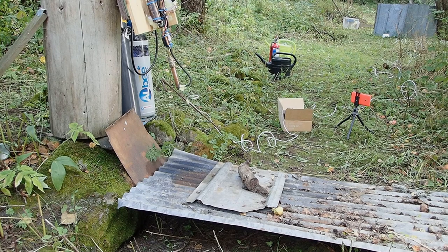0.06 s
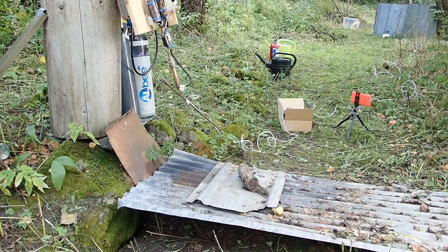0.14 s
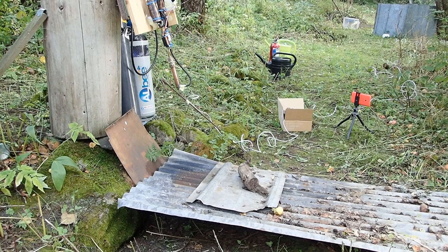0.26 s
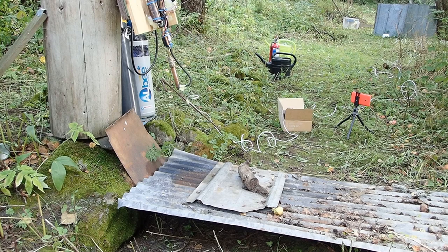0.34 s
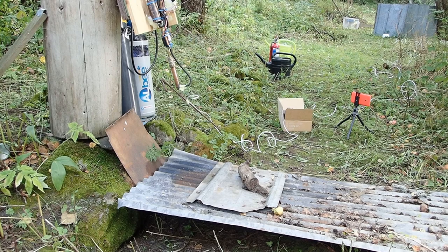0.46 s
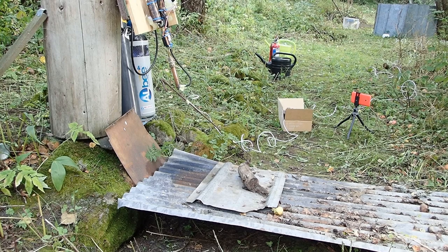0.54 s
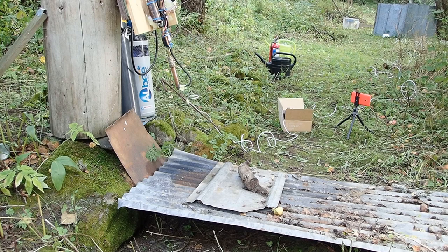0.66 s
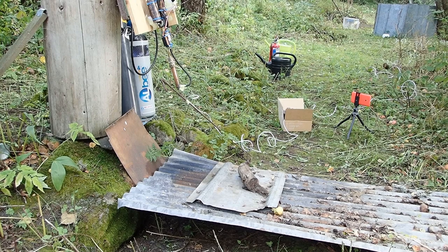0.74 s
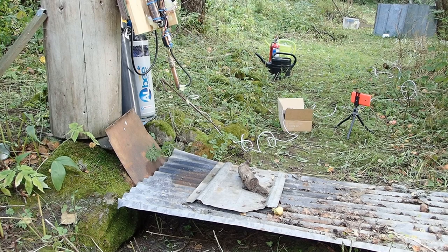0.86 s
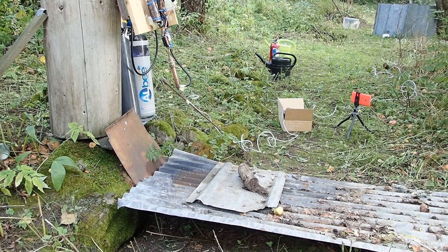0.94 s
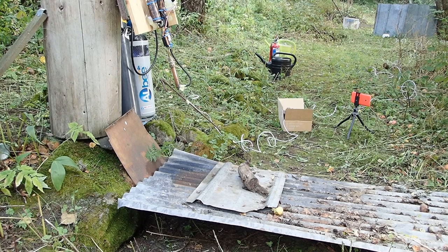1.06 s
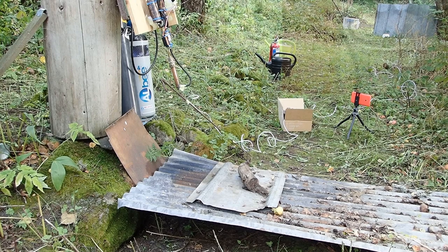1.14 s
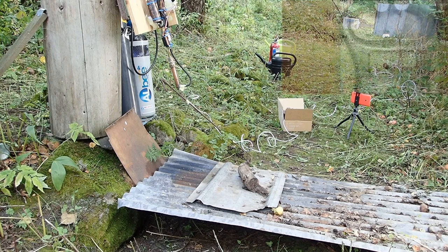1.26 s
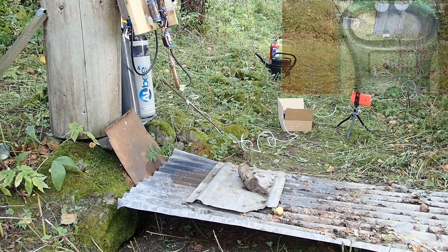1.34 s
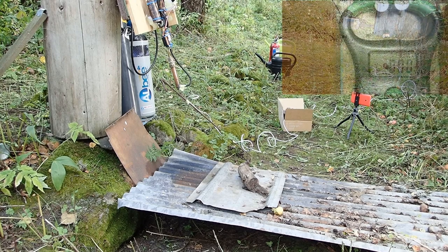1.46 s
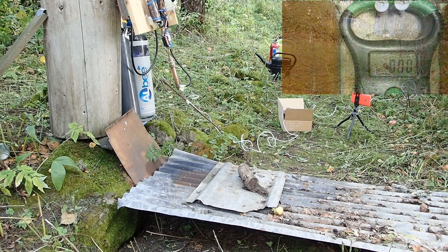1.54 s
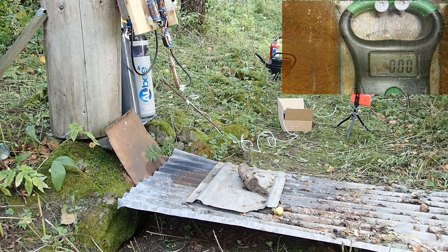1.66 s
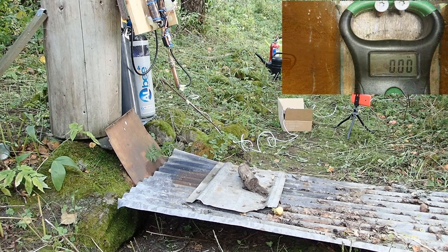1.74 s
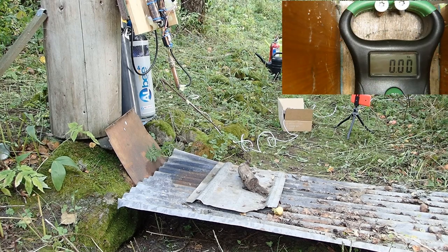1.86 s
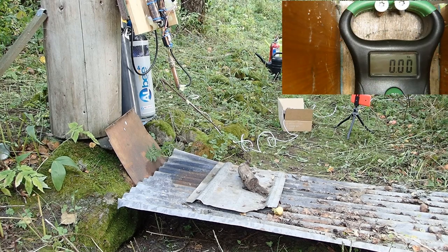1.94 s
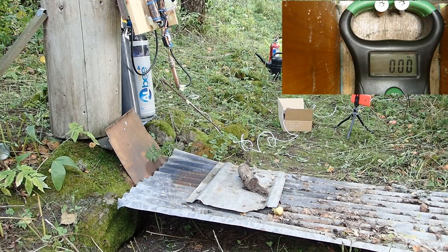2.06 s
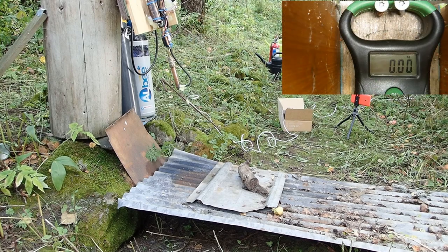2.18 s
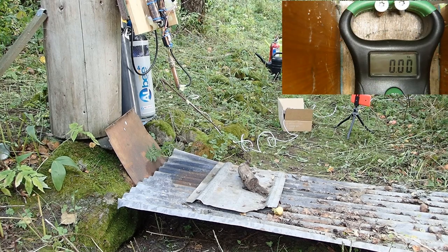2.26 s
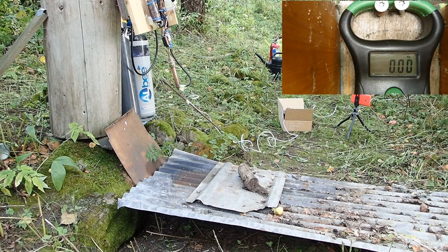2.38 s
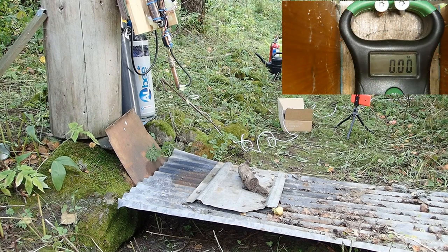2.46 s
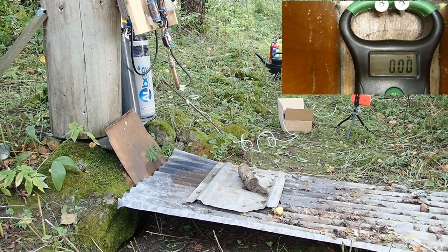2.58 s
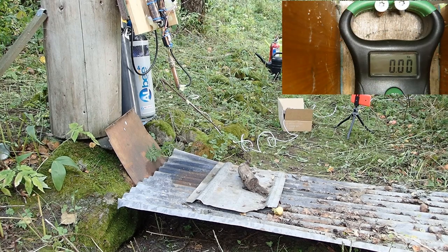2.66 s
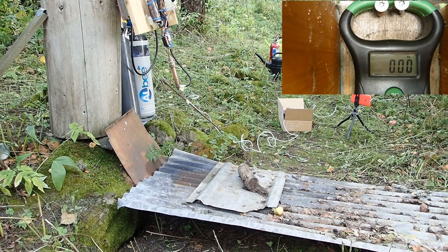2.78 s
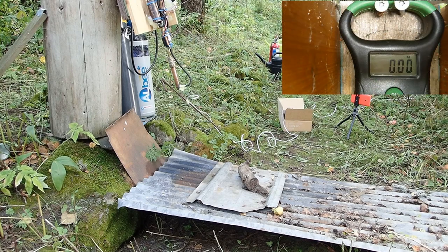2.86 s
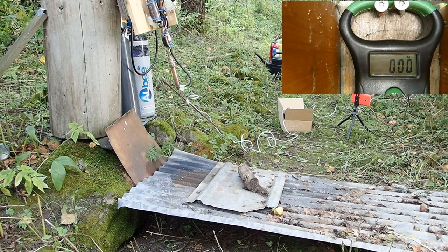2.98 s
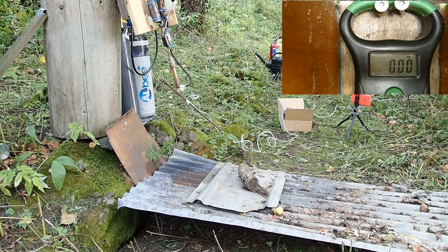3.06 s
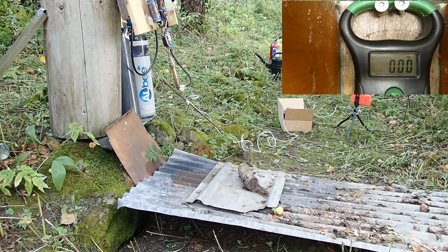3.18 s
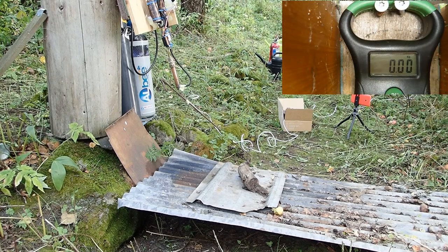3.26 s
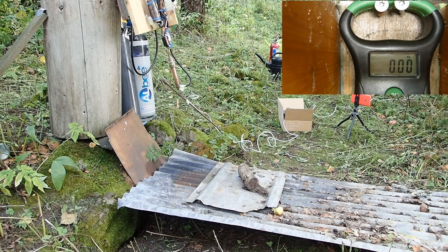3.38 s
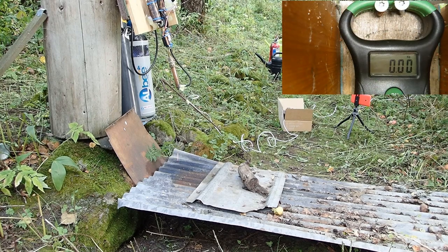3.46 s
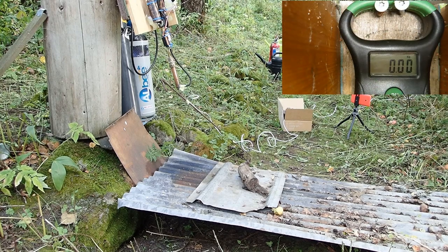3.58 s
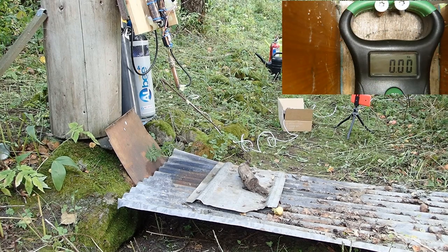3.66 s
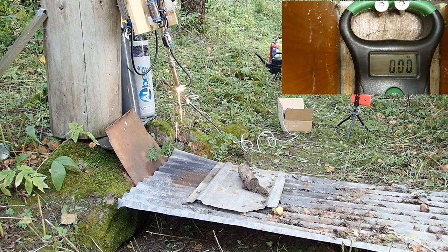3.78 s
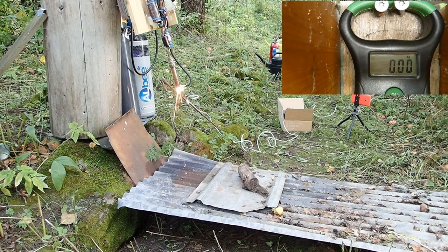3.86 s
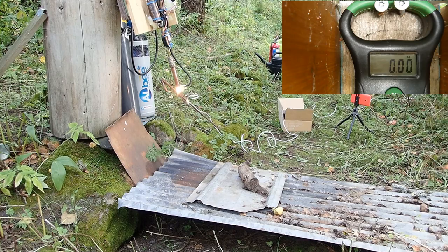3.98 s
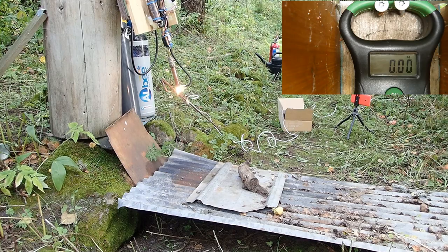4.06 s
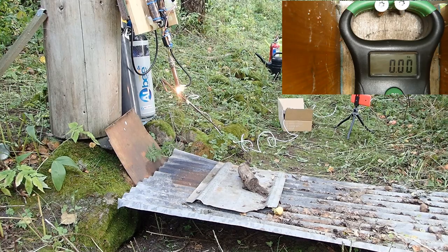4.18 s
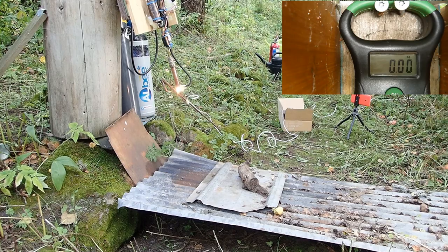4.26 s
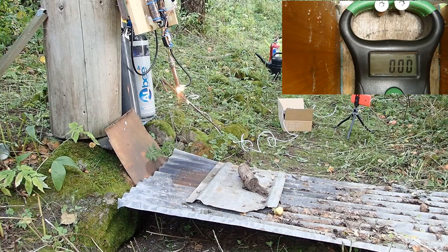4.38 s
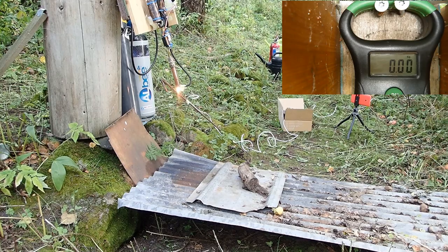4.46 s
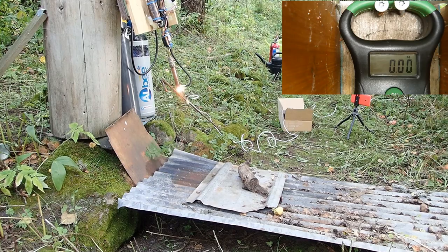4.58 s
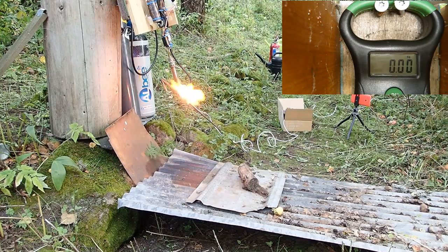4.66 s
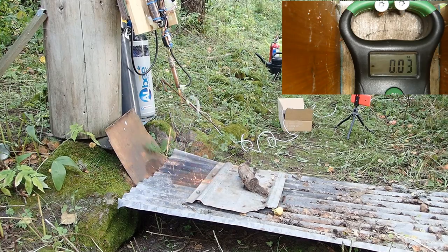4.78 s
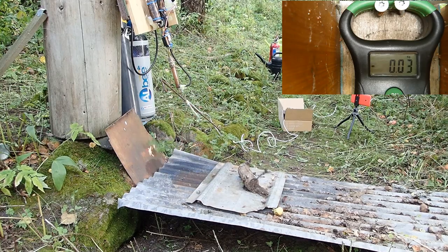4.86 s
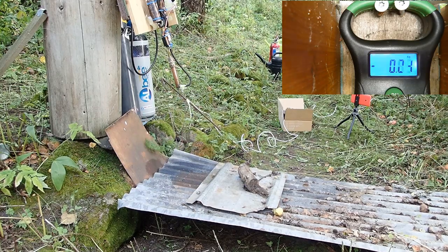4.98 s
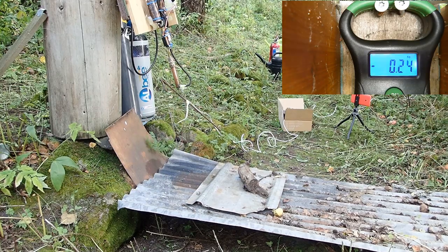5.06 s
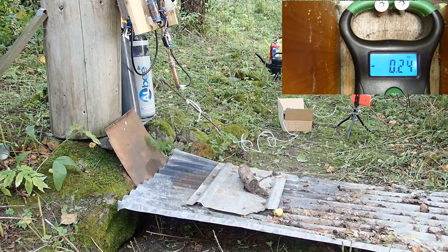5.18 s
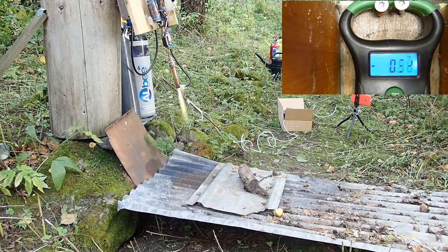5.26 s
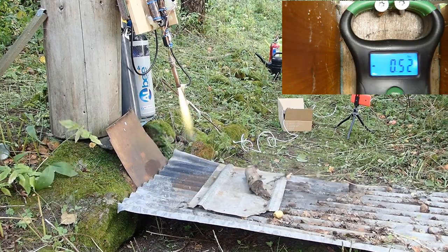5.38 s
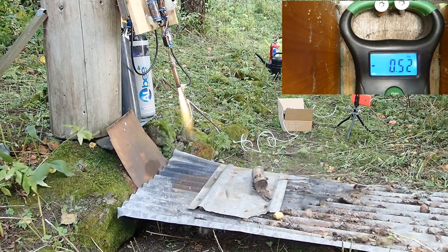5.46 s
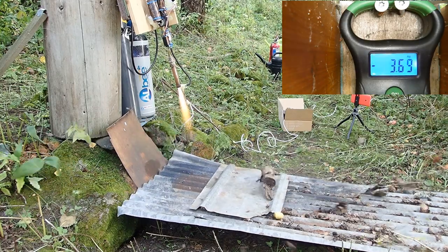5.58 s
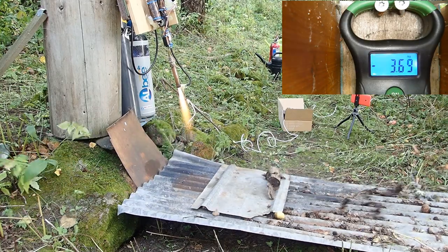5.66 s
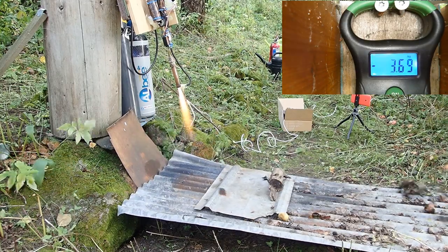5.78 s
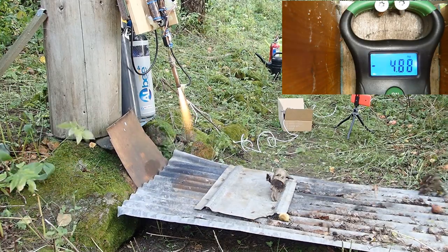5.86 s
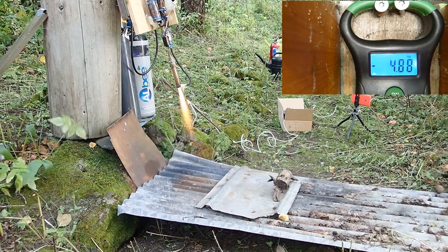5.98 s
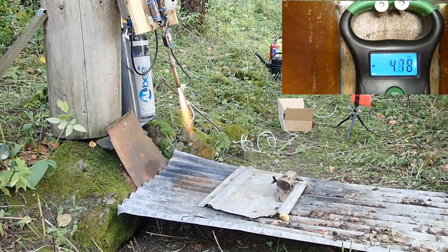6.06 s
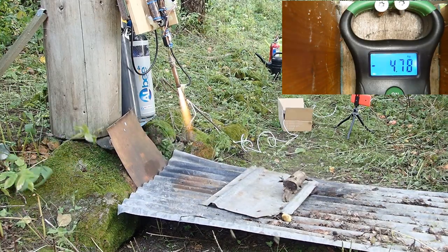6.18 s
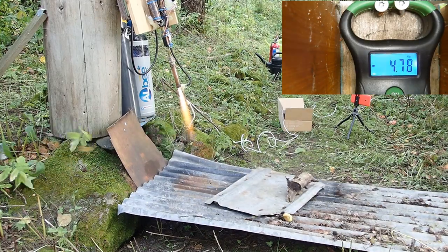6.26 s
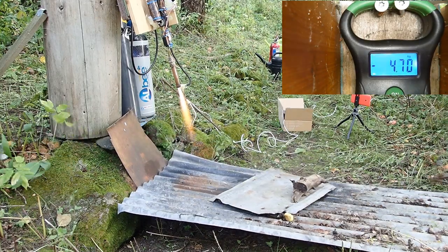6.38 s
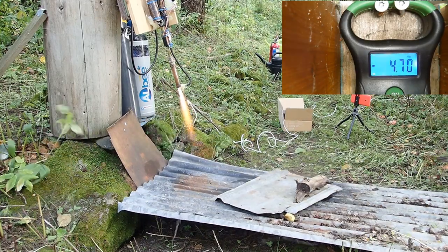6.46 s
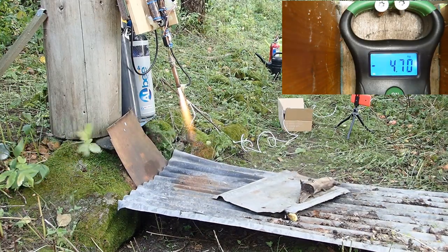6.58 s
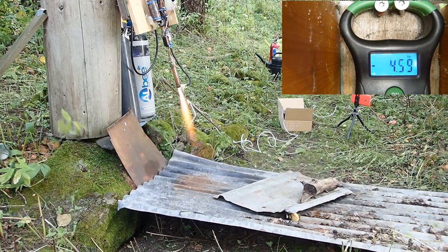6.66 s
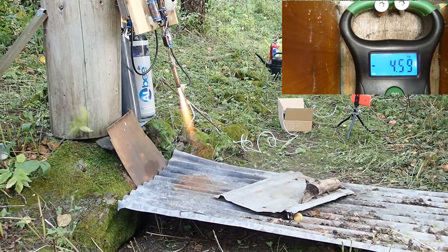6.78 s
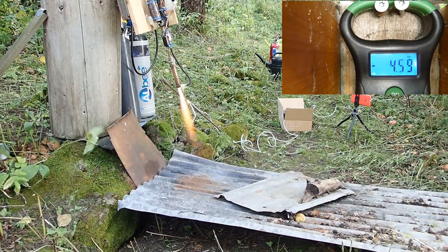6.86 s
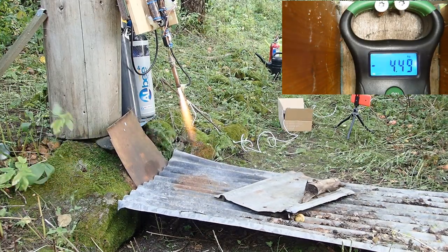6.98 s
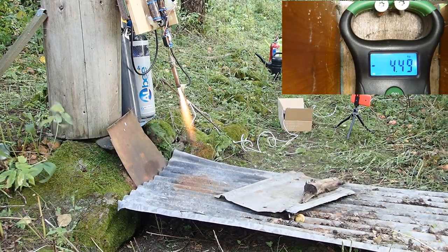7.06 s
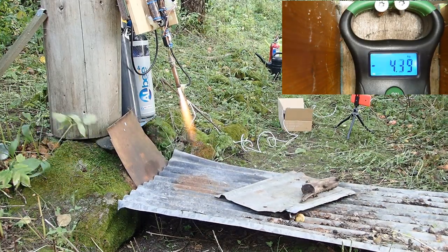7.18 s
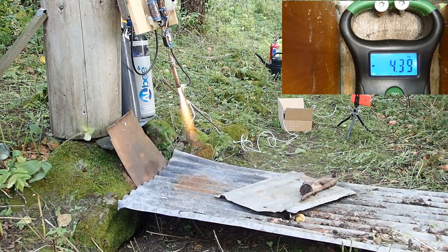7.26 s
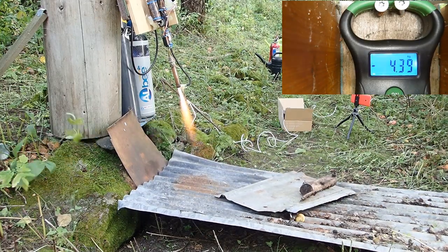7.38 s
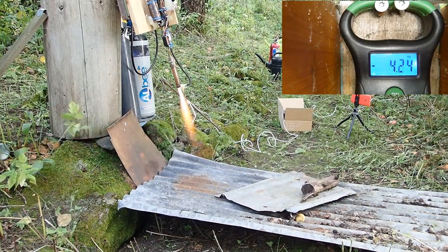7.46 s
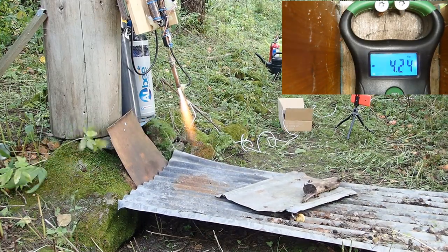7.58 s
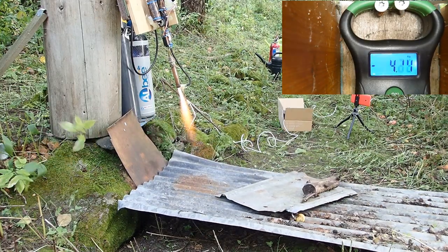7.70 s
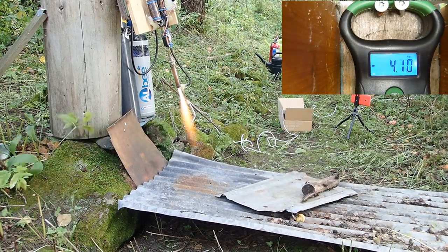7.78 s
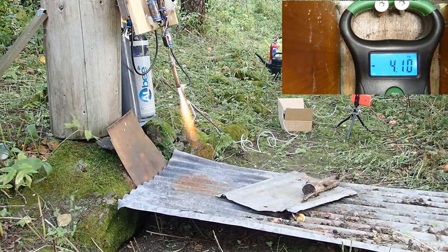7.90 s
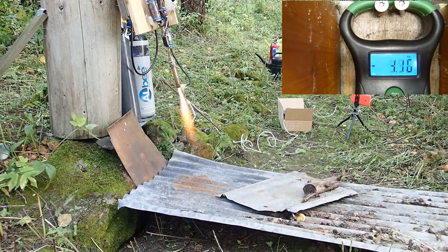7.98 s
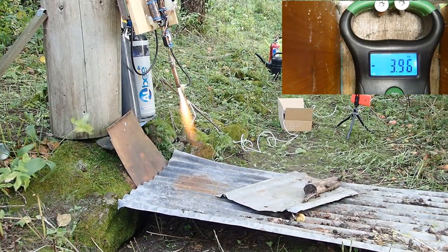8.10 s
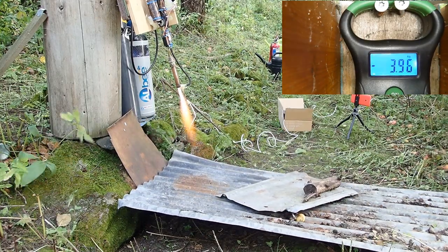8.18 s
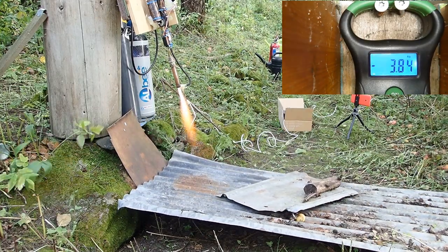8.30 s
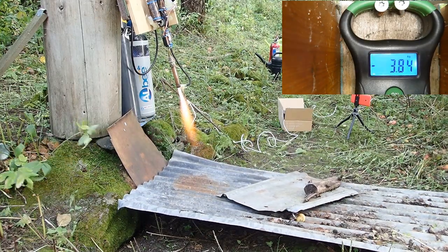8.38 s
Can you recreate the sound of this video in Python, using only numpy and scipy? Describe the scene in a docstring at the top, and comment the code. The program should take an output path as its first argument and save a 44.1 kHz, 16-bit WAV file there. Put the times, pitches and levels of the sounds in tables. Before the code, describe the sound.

Outdoors, close stereo pickup with little echo. For the first 1.6 seconds there is only faint microphone hiss, low rumble and a thin electronic whine. At 1.6 a gas valve opens: a steady, ringing, hollow hiss. Around 3.1 a soft flame lights, and the hiss's resonances leap up, dip, then glide higher as the flame hums. From 3.75 a pure howl swells quickly into a sharp bang at 3.87. A tearing flame grows behind a fluttering whistle rising in pitch, with tiny pops near 4.2 and a harder crack at 4.57. From 4.7 to 5.2 it sputters, raggedly popping and then locking into rapid buzzing chugs with a thin squeal. It thins briefly, then at 5.4 full thrust bursts in, overshoots, and settles into a loud, bright hissing roar with a wavering hollow note, dipping, rising slightly, then slowly sinking, still sounding at the end near 8.4.

```python
"""A gas hiss with gliding resonances gives way to a howl, a bang, whistling, sputter and a steady hissing roar.
A small gas-fed rocket engine is fired on a stand in a garden, a few metres from two microphones.
Flow noise excites the chamber, whose resonances glide as lighter fuel mixes in; flames and jet are coloured
noise with resonances, the singing flame is a wavering sine, the chugs are filtered pulses, and the pops are
decaying noise. Steady microphone hiss, a low rumble and a thin whine lie behind."""
import sys
import numpy as np
from scipy import signal
from scipy.fft import rfft, irfft, next_fast_len
from scipy.io import wavfile
from scipy.ndimage import map_coordinates

SR = 44100
rng = np.random.default_rng(int(sys.argv[2]) if len(sys.argv) > 2 else 0)


def digitize_waveform(pressure):
    """Quantize a signal to 16-bit integers and store it at the path in sys.argv[1].

    Rows of a 2-D input are taken as channels; values are limited to [-1, 1].
    """
    field = np.atleast_2d(pressure).T
    bounded = np.clip(field, -1, 1)
    quanta = np.round(bounded * 32767).astype(np.int16)
    wavfile.write(sys.argv[1], SR, quanta)


N = 371763

# gas mixture in the chamber: time_s, sound_speed (relative to the first gas)
GAS_MIXTURE = [(3.08, 1), (3.15, 1.82), (3.25, 1.54), (3.35, 1.36), (3.47, 1.61), (3.65, 1.76), (3.8, 1.87),
               (3.87, 2.03)]
# noise of the flame at the nozzle, also the thud of the pops: frequency_hz, density_db (per Hz, relative)
FLAME_SPECTRUM = [(20, -55), (100, -27), (220, -15.5), (330, -6.5), (480, -9), (900, 1), (1250, 4.5),
                  (1550, -1.5), (2100, -8), (2600, -15), (6000, -29)]
# exhaust hiss, also the crack of the pops: frequency_hz, density_db (per Hz, relative)
JET_SPECTRUM = [(200, -88), (1500, -16.5), (2500, -24), (3100, -24), (3700, -15.5), (4300, -15.5),
                (4900, -4), (5700, 0), (6600, 0.5), (7350, -3.5), (8700, 2), (9400, -1.5), (10400, -13),
                (13500, -12.5), (15700, -19)]
# stages (s): valve opens, flame lights, flame snaps inside, chugging starts and ends, full thrust
VALVE_S, LIGHT_S, BANG_S, CHUG_S, SMOOTH_S, THRUST_S = 1.635, 3.11, 3.872, 4.71, 5.24, 5.388
# pressure overshoots on reaching full burn, then settles with this time constant
SURGE_S = 0.073


def exhaust(throb):
    """Turbulent jet noise: it vents after the bang, swells, sags, recovers and surges, roughened by eddies."""
    # strength of the jet before full thrust: swells, sags through the chugging, recovers: time_s, level_db
    jet_strength = [(3.95, -34), (4.368, -14.5), (4.814, -12), (4.838, -13.5), (5.068, -17.5),
                    (5.244, -19.5), (5.38, -14)]
    blowdown_db, thrust_db, surge_db = -25, -15.5, 7.5
    full = ramp(THRUST_S, length_s=.01)
    venting = amp(blowdown_db) * settling(BANG_S, time_s=0.022)
    early = amp(curve(jet_strength)) + venting
    starting = (ramp(BANG_S) - full) * early * throb * amp(0.63 * wobble(50))
    thrust = full * amp(thrust_db + surge_db * settling(THRUST_S, SURGE_S) + 0.63 * wobble(40))
    eddies = amp(0.05 + 0.41 * wobble(600))
    return rush(JET_SPECTRUM) * (starting + thrust) * eddies


def roar():
    """Turbulent combustion gives broad noise; a resonance gives a hollow note with a weaker near-octave."""
    # combustion noise: frequency_hz, density_db (per Hz, relative)
    roar_spectrum = [(25, -45), (60, -31), (160, -10.5), (260, -10), (560, -7.5), (660, -10), (880, -2),
                     (1090, -4), (1800, -3.5), (2050, -10.5), (2420, -17), (3200, -23), (5000, -33)]
    # the exhaust's hollow note, sinking overall as thrust falls: time_s, pitch_hz
    hollow_note = [(5.43, 962), (5.6, 905), (6.2, 948), (7.12, 878.3), (7.6, 844), (8.43, 764)]
    roar_db, growth_db_per_s, overshoot_db = -26.5, .5, 10.5
    # the note swells as it passes through a resonance
    note_base_db, peak_hz, peak_width_hz, peak_db = -34.5, 820, 58, 9
    caught = ramp(THRUST_S, length_s=0.023)
    creeping = amp(-4) * ramp(SMOOTH_S, length_s=0.2) * (1 - caught)
    surge_db = overshoot_db * settling(THRUST_S, SURGE_S)
    body_db = roar_db + growth_db_per_s * since(THRUST_S) + 0.23 * wobble(30)
    body = rush(roar_spectrum) * amp(body_db) * (creeping + caught * amp(surge_db))

    pitch_hz = curve(hollow_note)
    wavering_hz = pitch_hz * (1 + 0.01875 * wobble(70))
    core = np.sqrt(2) * np.sin(phase_of(wavering_hz))  # the steadier part of the note
    breathy = narrow(pitch_hz, width_hz=50)
    octave = narrow(2.03 * pitch_hz, width_hz=54)
    note = amp(-4) * breathy + amp(-1.5) * core + amp(-6.0) * octave
    swell_db = peak_db * np.exp(-((pitch_hz - peak_hz) / peak_width_hz) ** 2)
    return body + note * caught * amp(note_base_db + swell_db + surge_db / 2)


def cold_gas():
    """Flow noise excites the chamber; resonant frequency rises in proportion to the speed of sound."""
    # lengthwise resonances at unit sound speed: frequency_hz, width_hz, peak_db (over the flow noise)
    chamber_modes = [(542, 40, 17.5), (1834, 95, 16), (3260, 90, 19), (4670, 170, 11.5), (6060, 145, 15),
                     (7560, 55, 21), (8980, 140, 18.5)]
    # resonances of the fittings, which stay put; fast gas flattens them: frequency_hz, width_hz, peak_db
    fitting_modes = [(1122, 52, 13), (5040, 45, 3), (6510, 70, 9), (8400, 90, 8), (9510, 100, 14.5),
                     (10080, 120, 14.5), (11000, 230, 13.5), (12050, 120, 12), (12800, 120, 7),
                     (13940, 230, 12)]
    # cold flow noise: frequency_hz, density_db (per Hz, relative)
    flow_spectrum = [(100, -20), (400, -12.5), (950, -5), (1550, 1.5), (2050, 1.5), (2350, -13.5),
                     (4150, -11.5), (4650, -5.5), (6000, 0.5), (9000, 0.5), (11500, -10.5), (13200, 5),
                     (14400, 3.5), (15600, -20)]
    # wall losses take the ring out of the highest resonances: frequency_hz, share (that rings)
    ring_share = [(9300, 0.99), (11000, 0.047), (13000, .05)]
    # left-right likeness of the cold flow: frequency_hz, likeness
    gas_alike = [(60, 0.12), (150, 0.25), (380, 0.9), (950, 0.99), (2380, 1.0), (5980, 0.87), (15000, 0.35)]
    gas_db, thin_gas_db = -23, -2.5  # level in the first gas; change per unit of relative sound speed

    def gain(hz, t):
        speed = np.interp(t, *np.transpose(GAS_MIXTURE))
        chamber = ringing(chamber_modes, hz / speed) ** along(ring_share, hz)
        return chamber * ringing(fitting_modes, hz) ** (1 / speed)

    flow = swept(rush(flow_spectrum, gas_alike), gain, size=1024)
    flow = with_tail(flow, tail_db=-3, t60=0.063)
    opening_db = -18 * settling(VALVE_S, time_s=.11)
    flow_db = gas_db + opening_db + thin_gas_db * (curve(GAS_MIXTURE) - 1)
    return flow * (ramp(VALVE_S) - ramp(BANG_S)) * amp(flow_db + 0.33 * wobble(25.13))


def soft_flame():
    """Flame noise excites modes at the nozzle: louder with more fuel, ringing more once the flame anchors."""
    # modes of the warm flame: frequency_hz, width_hz, peak_db (over the flame noise)
    flame_modes = [(644, 24, 24), (967, 27, 18), (1134, 27, 10), (1288, 86, 12.5)]
    soft_db, lean_loss_db, rich_speed = -19.5, 27, 1.733  # loss per unit of sound speed below a rich mixture
    loose_db, loose_share = -7, 0.53  # until it anchors it is weaker and rings less
    cold_flat, warm_s = 0.23, 0.2  # modes start flat by this share and rise as it warms
    anchored = ramp(3.33, length_s=0.075)
    tuning = 1 - cold_flat * settling(LIGHT_S, warm_s)
    share = loose_share + (1 - loose_share) * anchored

    def gain(hz, t):
        now = np.minimum((t * SR).astype(int), N - 1)
        modes = ringing(flame_modes, hz / tuning[now]) ** share[now]
        # the ringing reshapes the flame noise without changing its power
        return modes / np.linalg.norm(modes * amp(along(FLAME_SPECTRUM, hz)), axis=0)

    lean_db = -lean_loss_db * np.maximum(rich_speed - curve(GAS_MIXTURE), 0)
    flame_db = soft_db + loose_db * (1 - anchored) + lean_db
    burning = ramp(LIGHT_S, length_s=.03) - ramp(BANG_S)
    return swept(rush(FLAME_SPECTRUM), gain, size=4096) * burning * amp(flame_db + 1.3 * wobble(45))


def hard_flame():
    """Confined turbulent combustion tears inside the chamber, then fades as growing flow pushes it out."""
    # flame inside the chamber: frequency_hz, density_db (per Hz, relative)
    hard_spectrum = [(30, -62), (130, -24), (250, -25.5), (340, -10.5), (450, -23.5), (560, -8.5),
                     (720, -11.5), (1150, 0), (1450, 0.5), (1800, -7.5), (2100, -8), (2450, -26),
                     (3000, -26), (3900, -15), (6000, -40)]
    burn = envelope(BANG_S, attack_s=.38, rise_db=14.5, hold_s=.19, fall_db_per_s=33.5)
    burn = burn * (1 - ramp(THRUST_S))
    flame = with_tail(rush(hard_spectrum), tail_db=-4.5, t60=0.075)
    return flame * burn * amp(-17 + 1.1 * wobble(90))


def singing():
    """Thermoacoustic locking of heat release to a chamber mode: a rising tone that pulses and wavers."""
    # singing before and after the bang: start_s, pitch_hz, glide_hz_per_s, level_db, attack_s, rise_db,
    # hold_s, fall_db_per_s, flutter_hz, flutter_depth (0-1), jitter (share of pitch)
    flame_songs = [(3.747, 1153, 171, -9.5, 0.0835, 18, 0.037, 2600, 54.3, 0.27, 0.0113),
                   (3.88, 1267, 488.5, -17.5, 0.094, 8, 0.21, 220, 36.35, 0.56, 0.0099)]
    out = np.zeros(N)
    for start, hz, glide, db, attack_s, rise_db, hold_s, fall, flutter_hz, depth, jitter in flame_songs:
        pitch_hz = (hz + glide * since(start)) * (1 + jitter * wobble(120))
        flutter = np.cos(phase_of(flutter_hz * (1 + 0.283 * wobble(25))))
        tone = unit(np.sin(phase_of(pitch_hz)) * (1 + depth * flutter))
        out += amp(db) * envelope(start, attack_s, rise_db, hold_s, fall) * tone
    return out


def chugging():
    """Feed-coupled oscillation, ragged then locked: thumps, a squeal, and the swing driving flame and jet."""
    # one chug: frequency_hz, level_db (relative)
    thump_spectrum = [(25, -40), (60, -18), (100, -1), (195, 5), (300, -5), (550, 3), (800, -13),
                      (1500, -20), (3000, -35)]
    slow_hz, fast_hz, peak_s, arch_s = 81.2, 99, 5.08, .1  # mean rate speeds up and slows again in one arch
    ragged, locked = 0.61, 0.026  # irregularity of the rate while sputtering, then once locked
    squeal_hz, sag_hz = 6730, 420  # the nozzle's squeal sags as the chugs speed up
    arch = np.exp(-((np.arange(N) / SR - peak_s) / arch_s) ** 2)
    irregular = ragged + (locked - ragged) * ramp(4.87, length_s=0.1)
    rate_hz = (slow_hz + (fast_hz - slow_hz) * arch) * np.exp(irregular * wobble(80))
    cycles = np.cumsum(rate_hz) / SR
    beats = np.diff(np.floor(cycles), prepend=0) * amp(1.5 * wobble(120))  # one pulse a cycle
    active = ramp(CHUG_S) - ramp(SMOOTH_S)
    strength = envelope(CHUG_S, attack_s=0.17, rise_db=-1.0, hold_s=0.25, fall_db_per_s=90) * active
    thumps = unit(filtered(beats, lambda hz: amp(along(thump_spectrum, hz)))) * amp(-40.5) * strength
    squeal = narrow(squeal_hz - sag_hz * arch, width_hz=300) * amp(-15.5) * np.sqrt(arch) * active
    swing = active * np.cos(2 * np.pi * cycles)
    flare = amp(2 * arch)  # the flame is up to 2 dB stronger where the chugs are fastest
    return thumps, squeal, swing, flare


def pops():
    """Explosive pressure release: pockets of mixture give a thud and a crack, both decaying exponentially."""
    # sharp reports: start_s, thud_db, crack_db, t60_s
    reports = [(3.865, -7.5, -6, 0.029), (4.163, -20, -35, 0.018), (4.213, -22, -38, 0.018),
               (4.567, -10.5, -13, 0.02), (4.752, -15, -29, 0.023), (4.772, -16, -29, 0.049),
               (4.856, -19.5, -29, 0.076), (4.901, -21, -25, 0.088), (4.96, -33, -28, 0.023)]
    thud, crack = np.zeros((2, N + SR))
    t = np.arange(SR // 8) / SR
    for start_s, thud_db, crack_db, t60 in reports:
        decay = np.exp(-np.log(1000) * t / t60)
        first = round(start_s * SR)
        thud[first:first + len(t)] += amp(thud_db) * decay
        crack[first:first + len(t)] += amp(crack_db) * decay
    return thud[:N] * rush(FLAME_SPECTRUM) + crack[:N] * rush(JET_SPECTRUM)


def feed_hiss():
    """Narrow-band flow noise: the fittings hiss thinly as the flow recovers from the bang."""
    flow = envelope(BANG_S, attack_s=.18, rise_db=22, hold_s=.25, fall_db_per_s=30)
    return narrow(np.full(N, 13800), width_hz=450) * amp(-45) * flow


def background():
    """Noise floor: steady microphone hiss, a thin whine, and a low rumble turned down from bang to full thrust."""
    # steady microphone hiss: frequency_hz, density_db (per Hz, relative)
    hiss_spectrum = [(25, -35), (100, -7.5), (200, -8), (370, -7.5), (560, -9), (680, -17), (800, -8),
                     (1000, -10), (1900, -20.5), (3000, -33.5), (4300, -25.5), (5000, -14.5), (6000, -10),
                     (7500, -15.5), (9000, -12.5), (10500, -28), (15500, -31)]
    # low rumble: frequency_hz, density_db (per Hz, relative)
    rumble_spectrum = [(15, -30), (45, -8.5), (90, -2), (160, -7.5), (400, -48), (1000, -90)]
    # left-right likeness of the background: frequency_hz, likeness
    floor_alike = [(60, 0.14), (240, 0.44), (950, 0.84), (3770, 0.71), (15000, 0.08)]
    # faint electronic whine: frequency_hz, level_db (before the common cut of 4 dB below)
    whine_tones = [(5168, -59.5), (6272, -51), (6643, -57), (7381, -67), (7747, -78), (8118, -76),
                   (9222, -65)]
    rumble_base_db, gain_dip_db, late_db = -53, -12, -1  # change from bang to full thrust; change afterwards
    hiss = rush(hiss_spectrum, floor_alike) * amp(-44.74)
    rumble = rush(rumble_spectrum, floor_alike)
    gain_dip = ramp(BANG_S) - ramp(THRUST_S)
    rumble_db = rumble_base_db + gain_dip_db * gain_dip + late_db * ramp(THRUST_S)
    rumble = unit(rumble * amp(2.3 * wobble(19))) * amp(rumble_db)
    t = np.arange(N) / SR
    whine = sum(np.sqrt(2) * amp(db) * np.sin(2 * np.pi * hz * t) for hz, db in whine_tones)
    return hiss + rumble + amp(-4.0) * whine


def amp(db):
    """Level to amplitude: 20 dB is a factor of ten."""
    return 10 ** (np.asarray(db) / 20)


def unit(x):
    """Power normalisation: scale so that the mid channel has rms 1."""
    return x / np.sqrt(np.mean(np.atleast_2d(x).mean(0) ** 2) + 1e-20)


def along(points, hz):
    """Interpolation of (frequency_hz, value) points on a log-frequency axis."""
    f, v = np.transpose(points)
    return np.interp(np.log(hz + 1), np.log(np.abs(f) + 1), v)


def curve(rows):
    """Linear interpolation of a (time_s, value) table, per sample."""
    return np.interp(np.arange(N) / SR, *np.transpose(rows))


def phase_of(pitch_hz):
    """Phase in radians is the running integral of frequency."""
    return 2 * np.pi * np.cumsum(pitch_hz) / SR


def wobble(rate):
    """Slow random modulation: a smooth curve through random knots, rate of them a second."""
    return map_coordinates(rng.standard_normal(int(N * rate / SR) + 4), [np.arange(N) * rate / SR])


def filtered(x, response):
    """Linear filtering: the spectrum of x times a response of frequency."""
    m = next_fast_len(N + SR // 4)
    return irfft(rfft(x, m) * response(np.fft.rfftfreq(m, 1 / SR)), m)[..., :N]


def swept(x, gain, size):
    """Time-varying filtering: short-time spectra times gain(hz, seconds)."""
    hz, t, z = signal.stft(x, SR, nperseg=size)
    return unit(signal.istft(z * gain(hz[:, None], t), SR, nperseg=size)[1][:, :N])


def ringing(modes, hz):
    """Resonance: the gain of peaks whose powers add to a flat bed."""
    power = 1
    for centre, width, db in modes:
        power = power + amp(db) ** 2 / (1 + (2 * (hz - centre) / width) ** 2) ** 1.15
    return np.sqrt(power)


def rush(spectrum, alike=None):
    """Partial coherence: coloured stereo noise, partly alike at the two microphones."""
    # left-right likeness of the engine's noise: frequency_hz, likeness
    usual_alike = [(60, .3), (130, 0.71), (290, 0.54), (640, 0.76), (1410, 0.94), (3100, 1), (5000, 0.66),
                   (8500, 0.54), (15000, 0.083)]
    likeness = usual_alike if alike is None else alike

    def response(hz):
        turn = np.arccos(np.clip(along(likeness, hz), -1, 1)) / 2
        return amp(along(spectrum, hz)) * [np.cos(turn), np.sin(turn)]

    mid, side = filtered(rng.standard_normal((2, N)), response)
    return unit(np.array([mid + side, mid - side]))


def narrow(pitch_hz, width_hz):
    """Quadrature modulation: low-passed noise carried to one moving resonance."""
    drift = filtered(rng.standard_normal((2, N)), lambda hz: 1 / (1 + (hz / width_hz) ** 2))
    phase = phase_of(pitch_hz)
    return unit(drift[0] * np.cos(phase) + drift[1] * np.sin(phase))


def with_tail(x, tail_db, t60):
    """Short diffuse tail: brief random echoes, stronger in the treble, give the colour a fine ripple."""
    t = np.arange(SR // 8) / SR
    tails = rng.standard_normal((3, len(t))) * np.exp(-np.log(1000) * t / t60)
    tails = tails[0] + .5 * tails[1:]  # the two channels share most of the tail
    tails /= np.linalg.norm(tails, axis=1, keepdims=True)
    echoes = signal.fftconvolve(x, tails, axes=1)[:, :N]
    echoes = filtered(echoes, lambda hz: amp(along([(2000, -8.0), (4500, 2.5)], hz)))
    return unit(x + amp(tail_db) * echoes)


def since(start):
    """Elapsed time: seconds since a moment, zero before it."""
    return np.maximum(np.arange(N) / SR - start, 0)


def ramp(start, length_s=0.0043):
    """Linear onset from 0 to 1, beginning at start."""
    return np.minimum(since(start) / max(length_s, 1 / SR), 1)


def envelope(start, attack_s, rise_db, hold_s, fall_db_per_s):
    """Exponential growth and decay: switches on, moves rise_db to full gain, holds, then dies away."""
    growth_db = rise_db * (ramp(start, attack_s) - 1)
    fall_db = abs(fall_db_per_s) * since(start + attack_s + hold_s)
    return ramp(start) * amp(growth_db - fall_db)


def settling(start, time_s):
    """Exponential relaxation: 1 until start, then towards 0."""
    return np.exp(-since(start) / time_s)


def scene():
    """Superposition: the whole firing is the sum of its sources, with the chugs swinging flame and jet."""
    thumps, squeal, swing, flare = chugging()
    inner_flame = hard_flame() * flare * (1 + .5 * swing)
    throb = 1 + .2 * swing
    flames = soft_flame() + singing() + inner_flame
    start_up = cold_gas() + flames + feed_hiss() + squeal * throb + thumps + pops()
    return exhaust(throb) + roar() + start_up + background()


def record(dry):
    """Transduction: two microphones of differing colour, clipped at full scale and limited in band."""
    # balance of the microphones: frequency_hz, left_minus_right_db
    mic_balance = [(60, -9), (150, -3.5), (380, -1.0), (950, 1), (2380, -0.5), (5980, 1.0), (15000, 2)]
    halves = np.array([[.5], [-.5]])
    heard = filtered(dry, lambda hz: amp(along(mic_balance, hz) * halves))
    return filtered(np.clip(heard, -1, 1), lambda hz: hz < 15800)


dry = scene()
out = record(dry)
digitize_waveform(out)
```